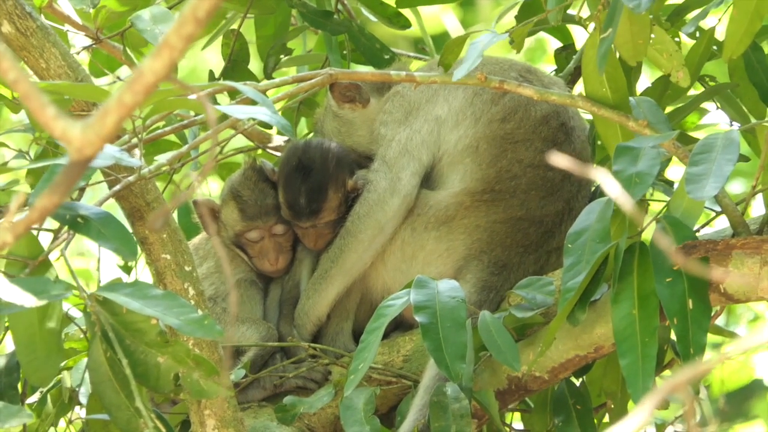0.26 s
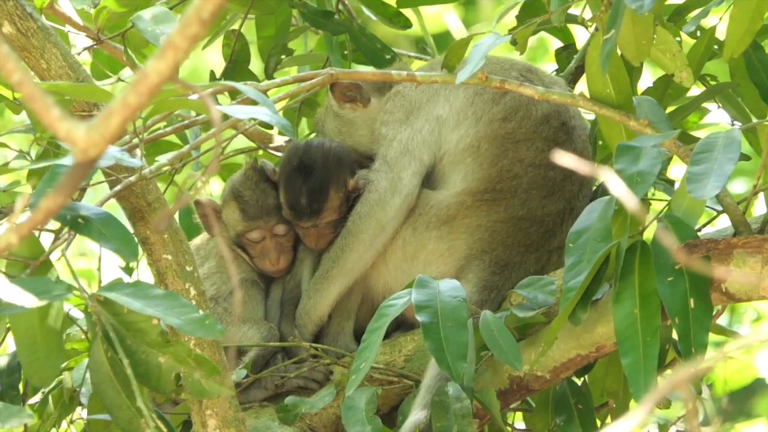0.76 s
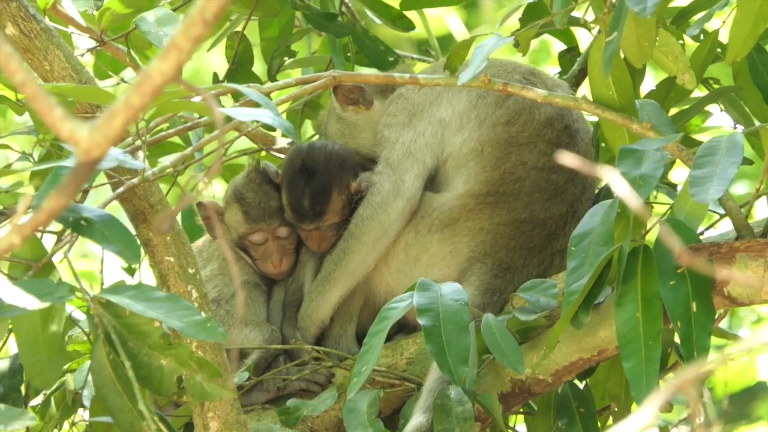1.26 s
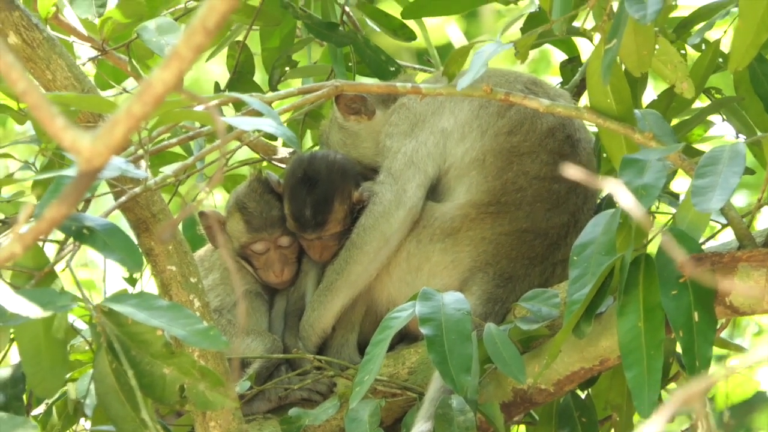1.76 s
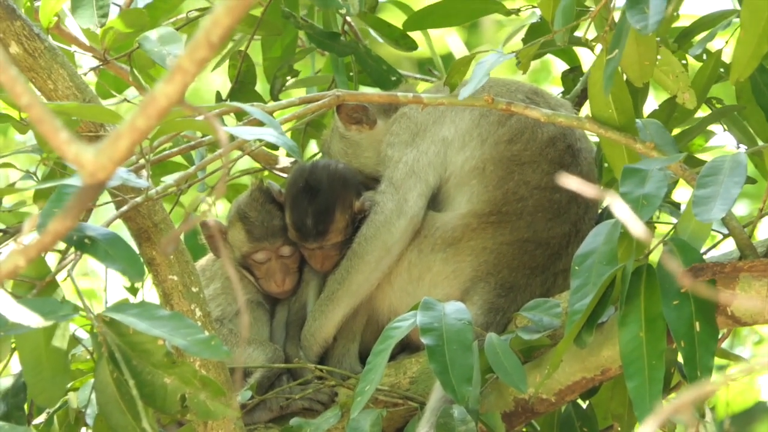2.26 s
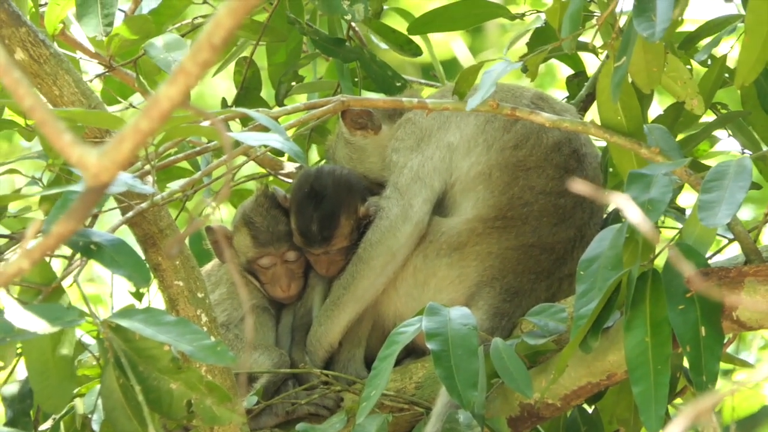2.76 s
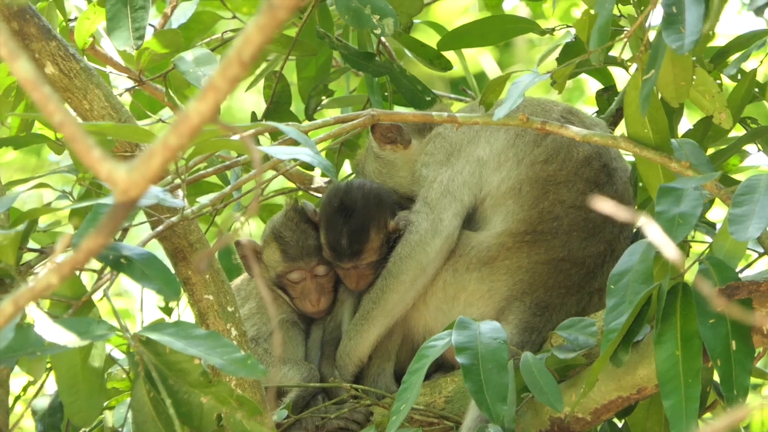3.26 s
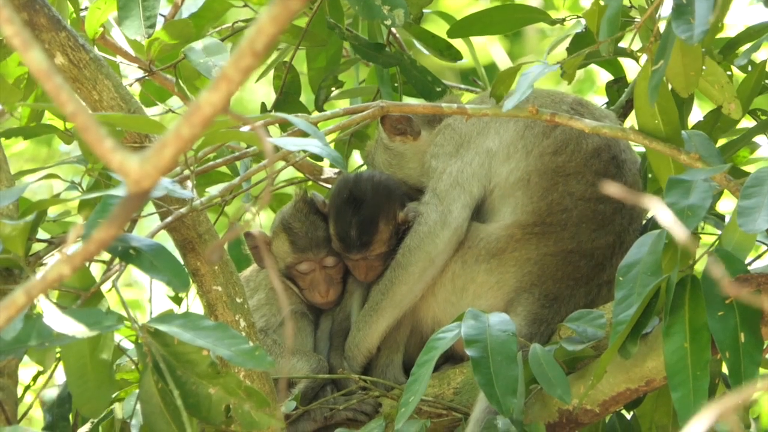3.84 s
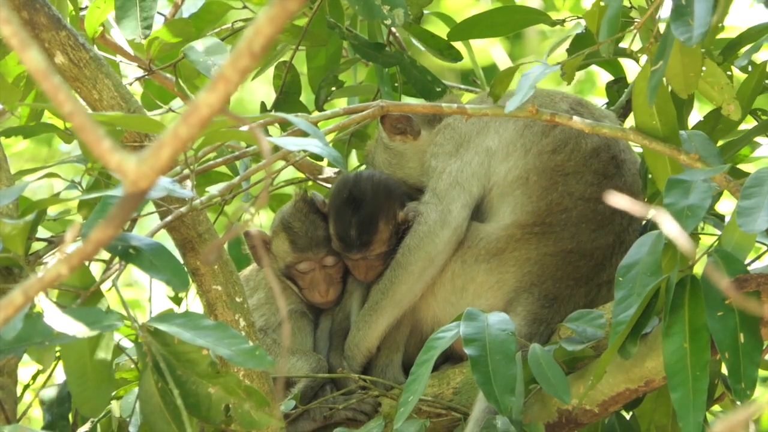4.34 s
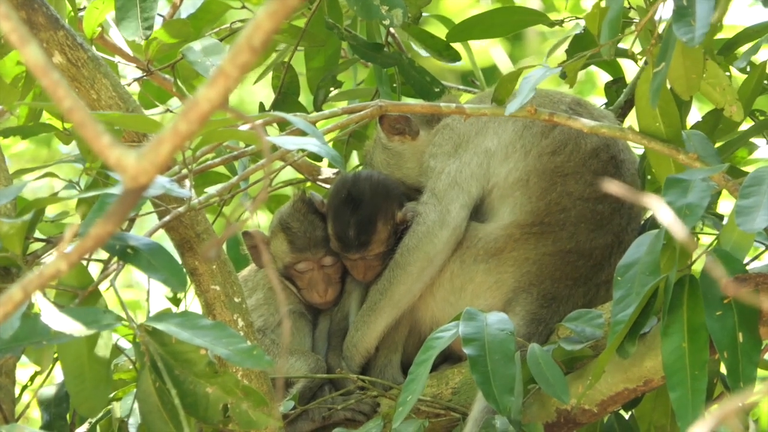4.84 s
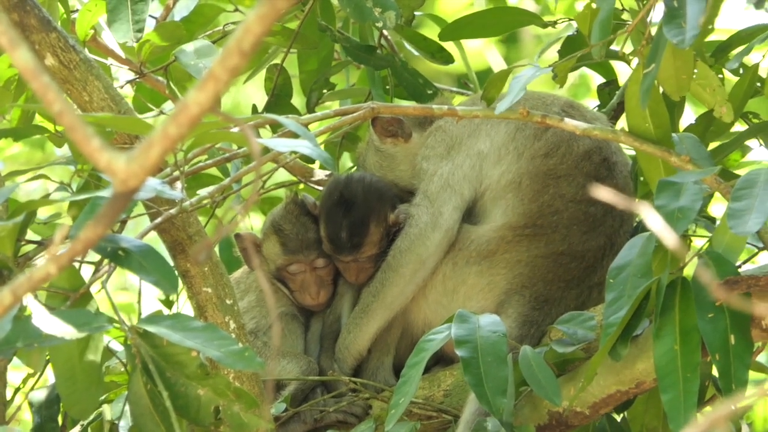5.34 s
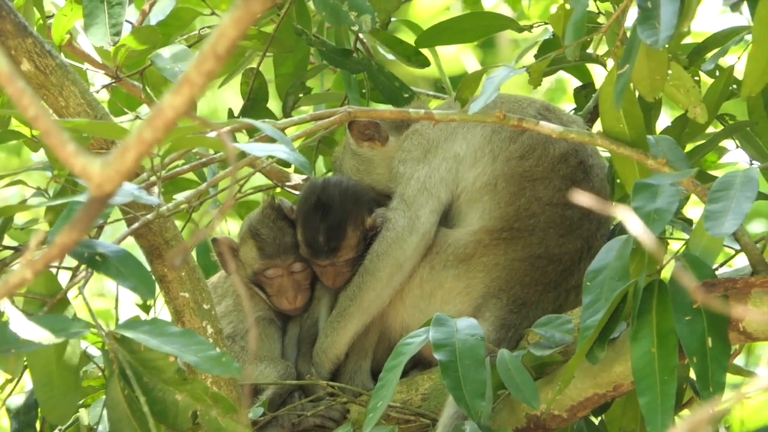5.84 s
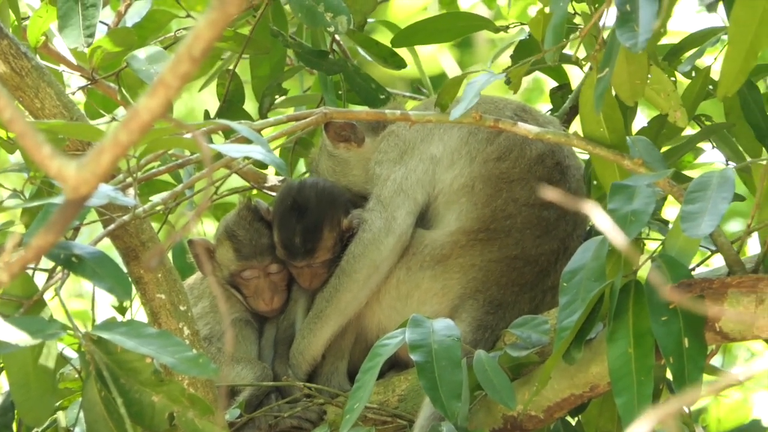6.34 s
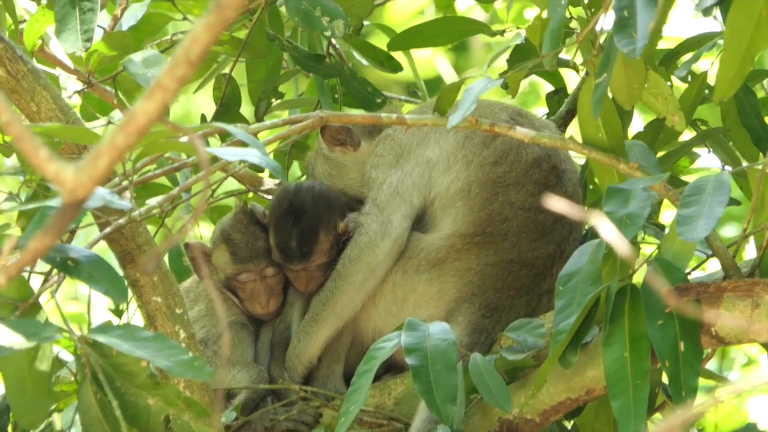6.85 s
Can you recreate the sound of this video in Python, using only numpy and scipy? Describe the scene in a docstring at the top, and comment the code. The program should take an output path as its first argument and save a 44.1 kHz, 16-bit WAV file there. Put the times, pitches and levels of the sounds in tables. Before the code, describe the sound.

In a leafy wood, small birds warble from the start: quick, high, near-pure whistles that glide up and down, some buzzy, each smeared by tree echoes. The notes come densely until about 2.8 seconds, with light twig ticks between them. A steady soft hiss, low rumble and blurred distant bird chorus lie behind; faint tyre noise rises near 2 seconds, and a far engine hums briefly around 2.7 and softly near 5. From about 3 seconds leaves rustle in a fine crackling wash, with sharper twig cracks from 3.4. Between 3.5 and 4 seconds a bird flutters past, fast airy wingbeats peaking near 3.75, with a tiny flutter at 4.3. The rustling gradually eases. A twig snaps at 5.6 as a far pulsing whirr sounds until about 5.85. Sparse, weaker high chirps close the scene near 7 seconds.

```python
"""Small birds warble in a tree: gliding whistled notes, each smeared by the echoes of the wood.
A bird flutters past on whirring wings, made of feather noise and puffs of air at each beat.
Twigs tick as short bursts of noise, and leaves rustle as a fine wash with small contacts on top.
Behind them are a far pulsing whirr, a blurred bird chorus, a far engine, tyre noise, hiss and rumble,
all heard at two microphone openings close together."""
import sys
import numpy as np
from scipy import signal
from scipy.fft import rfft, irfft
from scipy.io import wavfile

SR = 44100
rng = np.random.default_rng(int(sys.argv[2]) if len(sys.argv) > 2 else 0)


def pcm_store(signal):
    """Save signal as 16-bit PCM."""
    levels = np.round(np.clip(np.atleast_2d(signal), -1, 1) * 32767)
    wavfile.write(sys.argv[1], SR, levels.astype(np.int16).T)


N = 312669
TIME = np.arange(N) / SR


def amp(db):
    """Turns decibels into a gain."""
    return 10 ** (np.asarray(db) / 20)


def unit(x):
    """Scales a sound to an average strength (rms) of 1."""
    return x / np.sqrt(np.mean(x ** 2) + 1e-20)


def read(points, hz):
    """Reads a curve between its points, on a log-frequency axis."""
    f, value = np.transpose(points)
    return np.interp(np.log(hz + 1), np.log(f + 1), value)


def level_over_time(points):
    """Reads a level in dB at every moment, straight between the points."""
    return np.interp(TIME, *np.transpose(points))


def add(mix, s, sound):
    """Adds a sound into the mix, starting at s seconds."""
    part = mix[max(0, round(s * SR)):][:len(sound)]
    part += sound[:len(part)]


def colour(x, spectrum):
    """Makes some pitches stronger than others, following a spectrum; the result has rms 1."""
    hz = np.fft.rfftfreq(x.shape[-1], 1 / SR)
    return unit(irfft(rfft(x) * amp(read(spectrum, hz)), x.shape[-1]))


def wander(size, rate_hz):
    """Smooth random motion of rms 1, with changes up to about rate_hz."""
    hz = np.fft.rfftfreq(size, 1 / SR)
    slow = rfft(rng.standard_normal(size)) * np.exp(-(hz / rate_hz) ** 2)
    return unit(irfft(slow, size))


def narrow_noise(centre_hz, width_hz):
    """Noise of rms 1 in a narrow band: a tone whose strength and phase wander."""
    phase = 2 * np.pi * centre_hz * TIME
    return unit(wander(N, width_hz) * np.cos(phase) + wander(N, width_hz) * np.sin(phase))


def swell(s, width_s):
    """A smooth bump of height 1 at s, down to 37 % at width_s on either side."""
    return np.exp(-np.minimum(((TIME - s) / width_s) ** 2, 50))


def beat_times(first_s, last_s, per_s):
    """Times of an even run of beats, ending before last_s."""
    return np.arange(first_s, last_s, 1 / per_s)


def wood(x, near_db, near_t60, far_db, far_t60):
    """Direct sound, quick scatter from nearby leaves and a longer echo from the trunks.

    Each t60 is the time in seconds for that echo to fall by 60 dB."""
    t = np.arange(SR) / SR
    signs = rng.choice([-1., 1.], (2, SR))
    # about 2500 sparse reflections a second, none in the first 2 ms
    near, far = signs * (rng.random((2, SR)) < 2500 / SR) * (t > .002)
    near = near * amp(-60 * t / near_t60)
    far = far * amp(-60 * t / far_t60)
    echo = amp(near_db) * near / np.linalg.norm(near) + amp(far_db) * far / np.linalg.norm(far)
    echo[0] = 1  # the direct sound
    return signal.oaconvolve(x, echo / np.linalg.norm(echo))[:N]


# how alike the two microphone openings hear a sound: f/Hz, likeness [0-1]
LIKENESS = [(150, 1), (230, .994), (500, .988), (1100, .975), (1600, .999), (1800, 1), (8800, 1),
            (9800, .97), (11000, .72), (12000, .3), (14000, .2)]


def ports(pair, left_dull_db=-0.8):
    """Mixes two unrelated noises into what two close openings hear: least alike in the top treble.

    The left is also slightly duller there."""
    hz = np.fft.rfftfreq(N, 1 / SR)
    same = np.clip(read(LIKENESS, hz), 0, 1)
    mid, side = rfft(pair) * np.sqrt([(1 + same) / 2, (1 - same) / 2])
    left = amp(left_dull_db * np.interp(hz, [8500, 11500], [0, 1]))
    return irfft(np.array([left * (mid + side), mid - side]), N)


# tone of the forest hiss: f/Hz, relative level/dB (per Hz)
HISS_TONE = [(900, -26), (1300, -7.5), (1600, 0.5), (2100, 4.5), (2700, 2), (3300, 3), (3800, 6.5),
             (4550, 15.5), (5200, 6.5), (6000, 7), (7500, -2), (9500, 4.5), (12000, -5), (14500, -8.5)]
# tone of the far rumble: f/Hz, relative level/dB (per Hz)
RUMBLE_TONE = [(15, -62), (25, -65), (61, -7.5), (113, 0.5), (146, 2), (182, -5.5), (250, -4), (350, -13),
               (420, -19.5), (528, -12.5), (680, -21.5), (900, -13.5), (1200, -28.5), (1500, -24),
               (2000, -39), (3300, -100)]


def background(hiss_db=-52, rumble_db=-53, hum_hz=106, hum_db=-62):
    """Steady forest hiss and far rumble, both shaped noise, with a wavering narrow-band hum."""
    hiss = colour(ports(rng.standard_normal((2, N))), HISS_TONE) * amp(.5 * wander(N, 17))
    rumble = colour(ports(rng.standard_normal((2, N))), RUMBLE_TONE) * amp(wander(N, 5.0))
    hum = narrow_noise(hum_hz, width_hz=22.0)
    return amp(hiss_db) * hiss + amp(rumble_db) * rumble + amp(hum_db) * hum


# rise and fall of the far tyre noise: t/s, level/dB
TYRE_LEVEL = [(0, -68.5), (1.55, -67), (2.1, -56), (3.1, -83), (5.6, -68), (7.09, -61)]


def traffic(centre_hz=950, width_hz=110):
    """Far tyre noise, a soft narrow band of noise that rises and falls."""
    return amp(level_over_time(TYRE_LEVEL)) * narrow_noise(centre_hz, width_hz)


# swells of a far engine: loudest t/s, half length/s, firing rate f/Hz at that time, level/dB
ENGINE_SWELLS = [(2.192, .06, 128.8, -62), (2.68, .15, 109.4, -52.5), (5.053, 0.51, 120, -60.5)]


def drone(third_db=-5, sag_hz_per_s=8):
    """A far engine slowing a little, heard at two and three times its firing rate."""
    sound = np.zeros(N)
    for s, half_length, hz, db in ENGINE_SWELLS:
        firing_hz = hz - sag_hz_per_s * (TIME - s) + 2 * wander(N, 19.5)
        phase = 2 * np.pi * np.cumsum(firing_hz) / SR
        tone = np.sin(2 * phase) + amp(third_db) * np.sin(3 * phase)
        sound += amp(db + 3 * wander(N, 10)) * swell(s, half_length) * unit(tone)
    return sound


WHIRR_S, WHIRR_END_S, WHIRR_PER_S = 5.509, 5.85, 19.2  # start, end, pulses per second
WHIRR_DB, WHIRR_RISE_DB_PER_S = -49.5, 18  # first pulse before the echoes, then the growth


def far_whirr(centre_hz=2830, width_hz=240):
    """A far whirr, likely of wings: quick even pulses of narrow noise, growing louder and stopping."""
    pulses = np.zeros(N)
    for s in beat_times(WHIRR_S, WHIRR_END_S, WHIRR_PER_S):
        pulses += amp(WHIRR_DB + WHIRR_RISE_DB_PER_S * (s - WHIRR_S)) * swell(s, 0.013)
    whirr = narrow_noise(centre_hz, width_hz) * pulses
    return wood(whirr, near_db=-27, near_t60=.1, far_db=-7, far_t60=0.46)


# middle level of the distant chorus, which wavers about it: t/s, level/dB
CHORUS_LEVEL = [(0, -62.5), (.85, -61.5), (1.5, -64), (2.5, -60), (3.3, -55.5), (5.9, -57), (6.4, -83)]


def chorus(centre_hz=2730, width_hz=290):
    """Many distant birds blurred into one wavering narrow band of noise."""
    level = amp(level_over_time(CHORUS_LEVEL) + 2.7 * wander(N, 9.2))
    return level * narrow_noise(centre_hz, width_hz)


BRUSH_RISE_S, BRUSH_FALL_S = 0.028, 0.094


def brush(s, db):
    """Stir of a spray of leaves brushing its neighbours: a quick rise and a slower settling."""
    age = np.maximum(TIME - s, 0)
    rise = np.minimum(age / BRUSH_RISE_S, 1)
    settle = np.exp(-np.maximum(age - BRUSH_RISE_S, 0) / BRUSH_FALL_S)
    return amp(db) * rise * settle


# how hard the leaves stir, before the unrest and layer gains: t/s, level/dB
LEAF_STIR = [(0, -63), (.55, -94), (1.5, -81.5), (2.3, -58), (2.8, -60), (2.97, -50), (3.75, -47.5),
             (4.22, -53), (4.55, -50), (5.5, -55), (6.25, -55.5), (7.09, -68.5)]
# sprays of leaves brushing their neighbours, before the layer gains: t/s, level/dB
LEAF_BRUSHES = [(1.07, -57.5), (1.76, -54), (2.17, -51), (3.39, -47), (4.1, -53.5), (5.96, -53.5)]
# tone of the rustling leaves: f/Hz, relative level/dB (per Hz)
LEAF_TONE = [(900, -17), (1550, -19.5), (2050, 0), (2350, -3), (2830, -0.5), (3280, -9), (3600, -0.5),
             (4500, -0.5), (5200, -1), (6000, -1.5), (7300, -7.5), (8500, -6.5), (9600, -4), (12000, -11),
             (14500, -20.5)]
# tone of the breeze's low rush in the crown: f/Hz, relative level/dB (per Hz)
BREEZE_TONE = [(60, -45), (200, -2), (330, 0.5), (450, -14), (700, -5.5), (1100, -34), (2000, -52),
               (5000, -80)]


def leaves(contacts_per_s=700, spread_db=2.5, grain_db=-6, unrest_db=1, rustle_db=6, breeze_db=-12):
    """Leaves brush in a fine wash, with separate small contacts on top and the breeze rushing below."""
    gust = amp(level_over_time(LEAF_STIR) + unrest_db * wander(N, 11))
    stir = np.sqrt(gust ** 2 + sum(brush(*row) ** 2 for row in LEAF_BRUSHES))
    stir = stir / np.hypot(1, amp(-64) / stir)  # calm leaves barely touch
    # contacts of random size and sign at random moments
    sizes = amp(spread_db * np.minimum(rng.exponential(1, (2, N)), 3.5))
    sizes = sizes * rng.choice([-1, 1], (2, N))
    contacts = unit(sizes * (rng.random((2, N)) < contacts_per_s / SR))
    wash = rng.standard_normal((2, N))
    rustle = colour(ports(wash + amp(grain_db) * contacts), LEAF_TONE)
    flicker = amp(1.1 * wander(N, 70))
    breeze = colour(rng.standard_normal(N), BREEZE_TONE)
    return stir * (amp(rustle_db) * rustle * flicker + amp(breeze_db) * breeze)


# ticks of twigs and dry leaves: t/s, level/dB (before fading and echoes), decay/s,
# centre f/Hz, width [octaves]
TWIG_TICKS = [(0.438, -34.5, 0.0019, 4870, 2.1), (0.9296, -36, 0.002, 3840, 1.05),
              (1.04, -44, .003, 9500, 0.089), (1.074, -36, 0.005, 5600, 0.71),
              (1.576, -39, 0.0036, 2420, 0.33), (1.914, -36.5, .0025, 2800, 1.1),
              (2.165, -38, 0.017, 5400, 0.18), (2.698, -45, 0.0071, 1260, .2),
              (3.3948, -26, .0028, 7600, 0.9), (3.528, -29, 0.0058, 277, 0.47),
              (3.72, -27.5, .002, 6500, 0.68), (3.83, -29.5, 0.0041, 2820, 0.41),
              (4.0985, -29.5, 0.0066, 8800, 0.96), (4.1, -31.5, 0.0065, 2520, 0.089),
              (4.483, -36, 0.0076, 4020, 1.1), (5.3353, -44, 0.0014, 4000, .6),
              (5.598, -27.5, 0.0018, 3140, 0.7), (6.017, -45.5, .004, 1500, .6)]


def twigs(top_hz=10500):
    """Short cracks of noise, each in its own band; the foliage swallows their top treble."""
    t = np.arange(4096) / SR
    hz = np.fft.rfftfreq(4096, 1 / SR)
    cracks = np.zeros(N)
    for s, db, decay, centre_hz, octaves in TWIG_TICKS:
        band = np.exp(-.5 * (np.log2((hz + 1) / centre_hz) / octaves) ** 2)
        band = band / (1 + (hz / top_hz) ** 4)
        burst = unit(irfft(rfft(rng.standard_normal(len(t))) * band))
        shape = np.exp(-t / decay) * (1 - np.exp(-t * centre_hz))  # fast start, then fading
        add(cracks, s, amp(db) * burst * shape)
    return wood(cracks, near_db=-6, near_t60=0.13, far_db=-14, far_t60=0.24)


# flutters: first beat t/s, end t/s, nearest t/s, swish level/dB, air push level/dB
# (levels at the nearest point, before the echoes)
FLUTTERS = [(3.528, 3.98, 3.757, -33, -41.5), (4.314, 4.39, 4.3, -48, -49)]
# tone of the feather swish: f/Hz, relative level/dB (per Hz)
SWISH_TONE = [(1000, -33), (1350, -8), (1650, -8), (2020, 10), (2300, -1.5), (2950, 13), (3350, -23),
              (3800, 3), (5200, -5.5), (7000, -13), (13000, -22)]
# tone of the pushed air: f/Hz, relative level/dB (per Hz)
PUSH_TONE = [(100, -39), (200, -0.5), (320, 7.5), (530, -9), (670, 3.5), (820, -3.5), (1050, -21),
             (1350, -7.5), (1900, -37)]
WINGBEATS_PER_S = 19
SWISH_REACH_S, PUSH_REACH_S = 0.062, 0.16  # how long each stays loud about the nearest point


def wings():
    """Each even beat swishes the feathers and shoves a puff of air, louder the nearer the bird is."""
    swish, push = np.zeros(N), np.zeros(N)
    for first, last, nearest, swish_db, push_db in FLUTTERS:
        for s in beat_times(first, last, WINGBEATS_PER_S):
            swish_fade = np.hypot(1, (s - nearest) / SWISH_REACH_S)
            push_fade = np.hypot(1, (s - nearest) / PUSH_REACH_S)
            swish += amp(swish_db) / swish_fade * swell(s, 0.019)
            push += amp(push_db) / push_fade * swell(s, 0.014)
    flicker = unit(amp(1.2 * wander(N, 220)))
    feathers = colour(rng.standard_normal(N), SWISH_TONE) * flicker
    air = colour(rng.standard_normal(N), PUSH_TONE)
    return wood(swish * feathers + push * air, near_db=-4.0, near_t60=0.06, far_db=-3.5, far_t60=0.97)


NOTE_TAPER = .35  # share of a note spent swelling and fading
GLIDE_BEND = 1.53  # above 1, the pitch moves fastest at the start, then settles


def note(length, start_hz, end_hz, level_db, buzz, depth=0.0693, trill_hz=170, waver=0.0069, octave_db=-36):
    """A near-pure whistle that glides and settles; buzz shakes its pitch quickly.

    depth and waver are shares of the pitch; octave_db sets a faint overtone."""
    t = np.arange(int(length * SR)) / SR
    shake = wander(8192, 400)[:len(t)]
    drift = wander(8192, 90)[:len(t)]
    glide = end_hz + (start_hz - end_hz) * (1 - t / length) ** GLIDE_BEND
    trill = np.sin(2 * np.pi * trill_hz * t) + 0.595 * shake
    pitch_hz = glide * (1 + depth * buzz * trill + waver * drift)
    phase = 2 * np.pi * np.cumsum(pitch_hz) / SR
    tone = np.sin(phase) + amp(octave_db) * np.sin(2 * phase)
    return amp(level_db) * unit(tone * signal.windows.tukey(len(t), NOTE_TAPER))


# sung notes: t/s, length/s, start f/Hz, end f/Hz, level/dB (before the echoes), buzz [0-1]
SONG_NOTES = [(0, 0.024, 5690, 5160, -33.5, 0.15), (0, .08, 6100, 5660, -39, 1),
              (0.093, 0.065, 5280, 6000, -39, 0.33), (0.116, 0.1, 3200, 3480, -49, 0.16),
              (.2, 0.098, 3520, 3450, -43, 0.44), (0.214, 0.049, 5200, 5000, -35, 0.02),
              (0.367, 0.034, 3390, 3450, -39, 0.05), (.405, 0.047, 3450, 3900, -38, 0.4),
              (0.411, 0.032, 4640, 4694, -37, 0.1), (0.557, 0.092, 2940, 2490, -50, 0),
              (.611, 0.034, 5946, 5890, -38, 0.34), (0.619, 0.028, 5930, 5170, -42.5, .45),
              (.745, 0.044, 2800, 2788, -45.5, 0), (0.784, 0.047, 2725, 2464, -46, 0.16),
              (0.839, 0.042, 2660, 2810, -49, 0.1), (0.913, 0.056, 3817, 3737, -41, 0.15),
              (0.924, 0.05, 2770, 2410, -45, 0.64), (0.952, 0.065, 3420, 3090, -44, 0.6),
              (1.019, 0.077, 1740, 1930, -60, 0), (1.027, 0.088, 3623, 4150, -37.5, 0.08),
              (1.173, 0.019, 1646, 1726, -56, 0.4), (1.179, 0.018, 3430, 3170, -47.5, 0.7),
              (1.375, .05, 2610, 2703, -47.5, 1), (1.515, 0.028, 6140, 5970, -36.5, 0.15),
              (1.562, 0.047, 6000, 5880, -40.5, 0.13), (1.603, 0.034, 5850, 5820, -38, 0.13),
              (1.694, 0.054, 3800, 3665, -49, 0.5), (1.749, 0.034, 4540, 5050, -36.5, 0.48),
              (1.785, 0.11, 5303, 5380, -38.5, 0.12), (1.94, 0.032, 3996, 4020, -43.5, 0),
              (1.959, 0.026, 3880, 3590, -45, 0.6), (1.998, 0.036, 3160, 3090, -47.5, 0),
              (2.046, 0.054, 3240, 3120, -47, 0.15), (2.09, 0.024, 2950, 2740, -41.5, 0.2),
              (2.21, 0.03, 3250, 3220, -43, 0), (2.238, 0.11, 2980, 2907, -51.5, .3),
              (2.375, 0.028, 3846, 3545, -36, 0.27), (2.407, 0.037, 3570, 4060, -41, 0.04),
              (2.47, 0.0284, 4270, 5090, -33.5, 0.96), (2.508, 0.018, 4880, 4980, -43, .2),
              (2.532, 0.042, 5310, 5235, -35.5, 0.42), (2.621, 0.065, 5230, 5630, -41, 0.2),
              (2.67, 0.062, 5735, 5680, -35.5, 0.25), (2.778, 0.049, 2700, 2650, -46.5, 0.6),
              (2.938, 0.078, 2690, 2840, -48.5, 0.2), (3.138, .12, 2697, 2970, -47, 0.1),
              (3.295, 0.076, 3320, 3860, -46, .35), (3.572, 0.09, 5470, 5790, -38, 0.2),
              (3.688, 0.052, 5370, 5030, -40, 0.56), (4.319, .045, 5410, 5370, -51, 0),
              (4.387, 0.063, 3650, 3710, -53, 0), (4.789, 0.032, 6130, 5970, -47, 0.14),
              (4.913, 0.03, 6020, 6130, -47, 0.4), (5.136, 0.085, 6540, 6300, -46.5, .25),
              (5.137, 0.035, 4200, 3930, -45.5, 0.1), (5.875, 0.061, 2920, 2510, -55, 0.7),
              (6.637, 0.027, 2430, 2620, -53.5, 0.4), (6.687, 0.17, 7030, 6700, -49, 0.25),
              (6.753, 0.046, 5750, 5330, -48, .5), (6.856, 0.063, 6290, 6130, -44.5, .6),
              (6.867, 0.03, 5350, 4920, -45, 0.55)]


def song():
    """Warbled notes from deep in the foliage, each with its own random scatter of echoes."""
    voice = np.zeros(N)
    for s, *shape in SONG_NOTES:
        add(voice, s, wood(note(*shape), near_db=-8.5, near_t60=0.15, far_db=0.0, far_t60=0.68))
    return voice


def scene():
    """Adds up all sources at the two microphone openings."""
    distance = background() + traffic() + drone() + far_whirr() + chorus()
    return distance + leaves() + twigs() + wings() + song()


EDGE_HZ = 14400


def record(dry):
    """Limits the treble with a low-pass filter that cuts above about EDGE_HZ."""
    low_pass = signal.firwin(301, EDGE_HZ, window=("kaiser", 8), fs=SR)
    return signal.oaconvolve(dry, low_pass[None], "same")


dry = scene()
out = record(dry)
pcm_store(out)
```